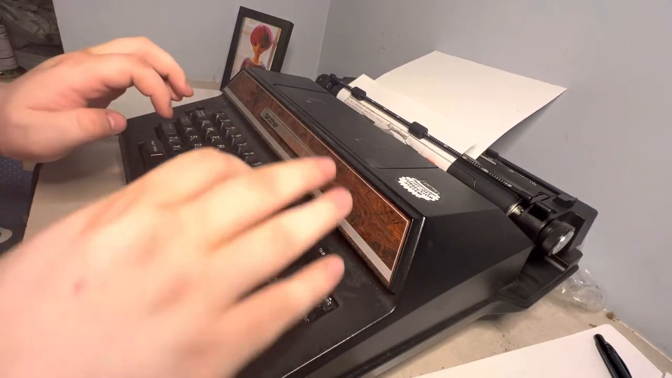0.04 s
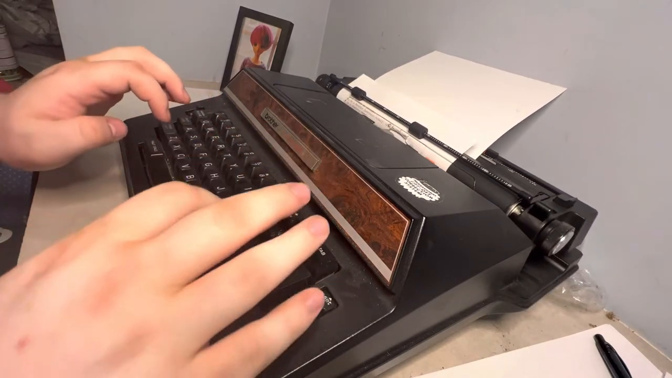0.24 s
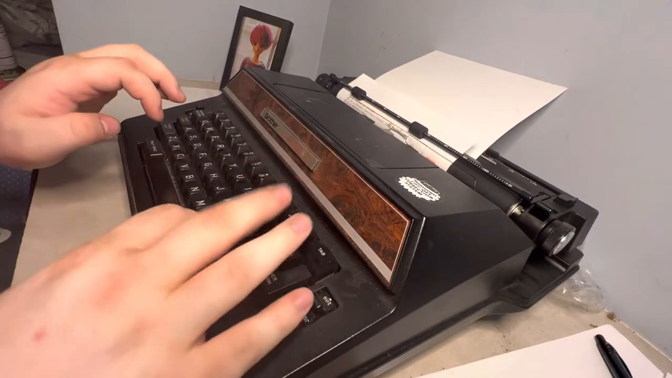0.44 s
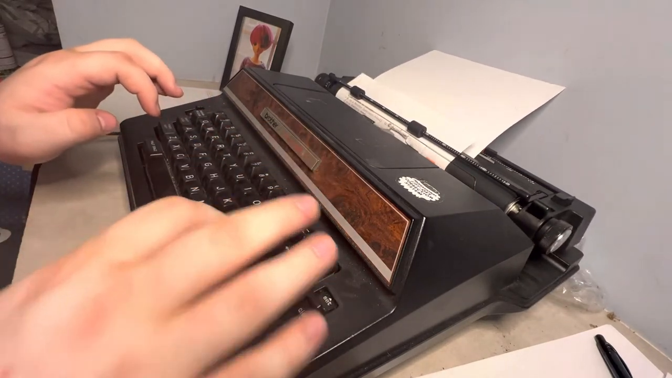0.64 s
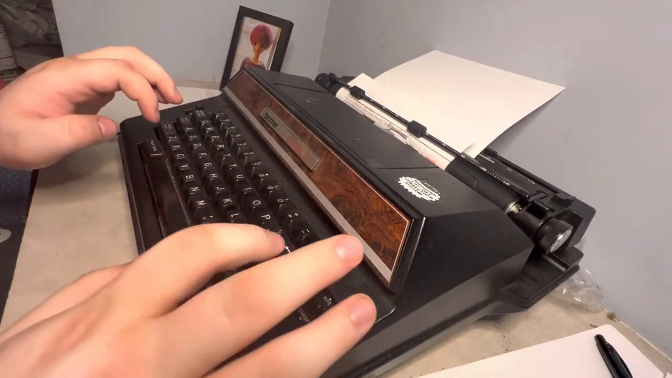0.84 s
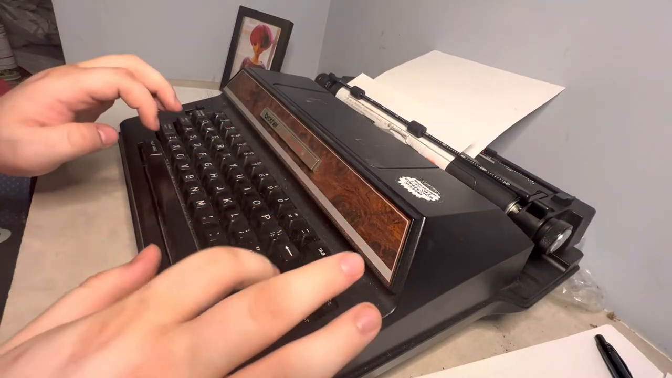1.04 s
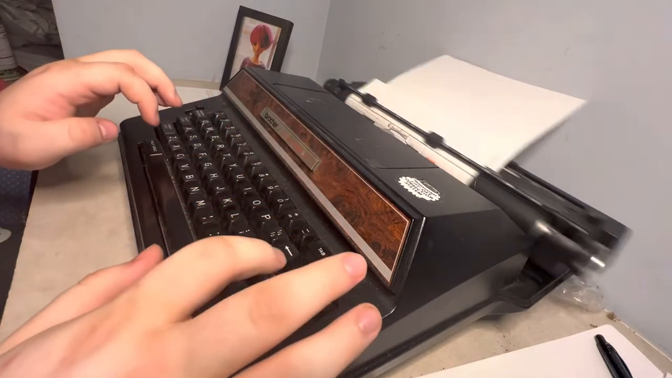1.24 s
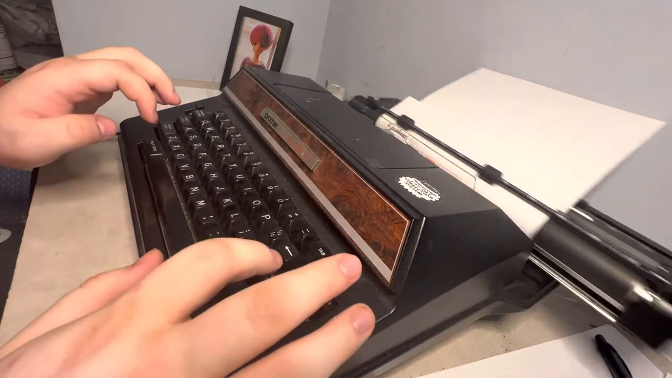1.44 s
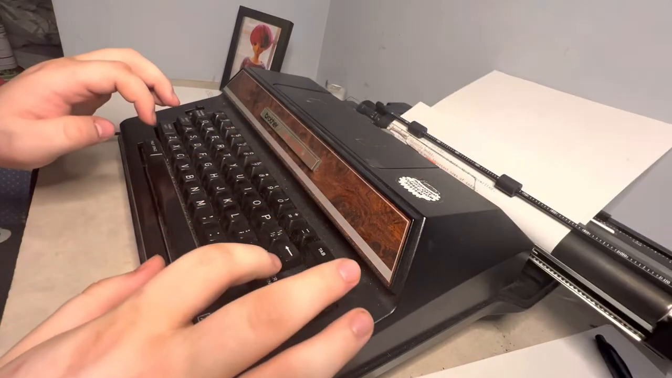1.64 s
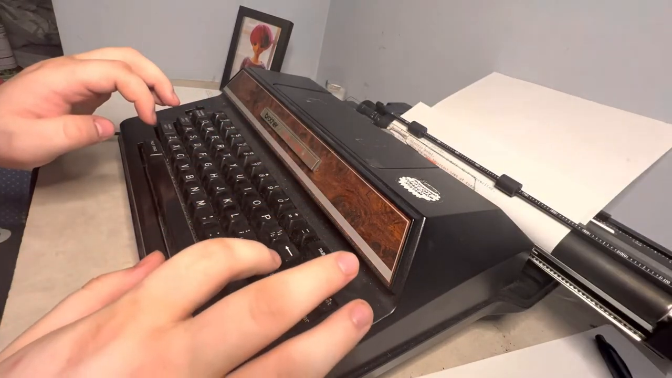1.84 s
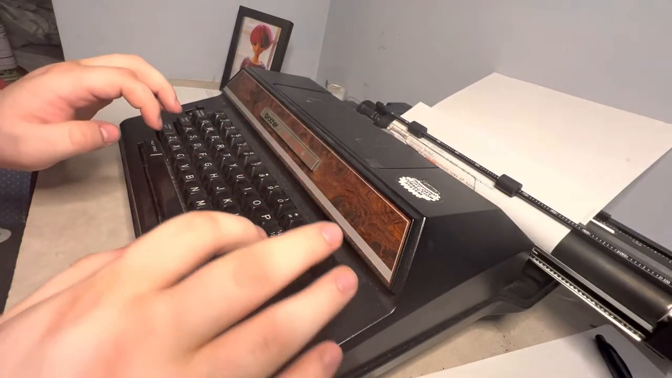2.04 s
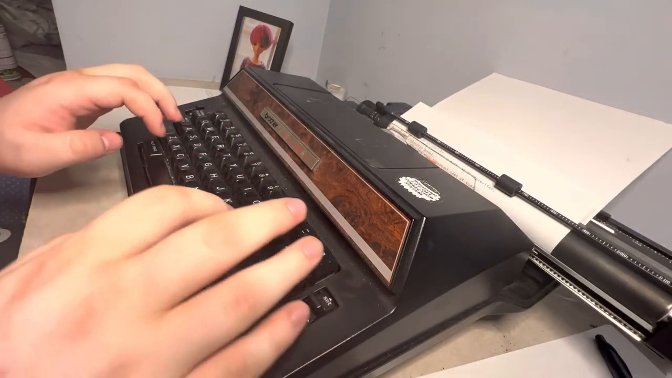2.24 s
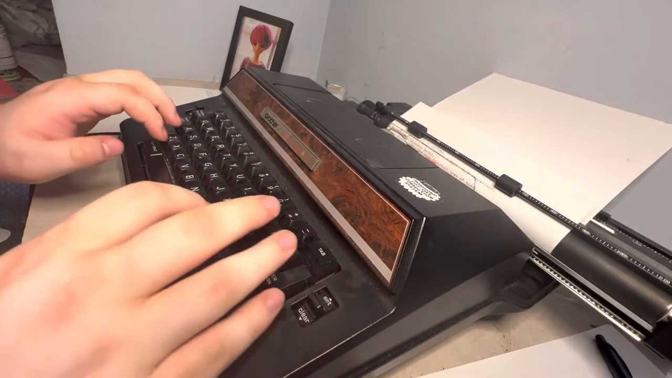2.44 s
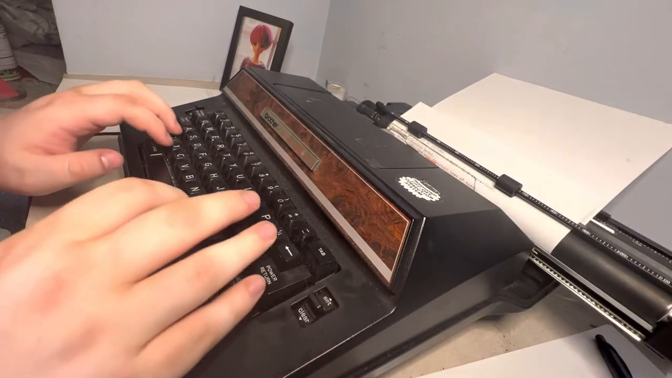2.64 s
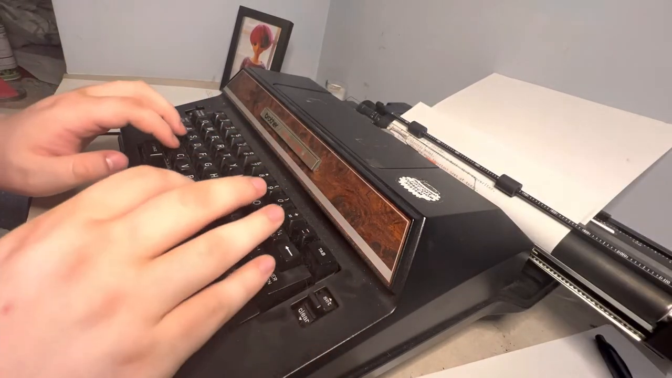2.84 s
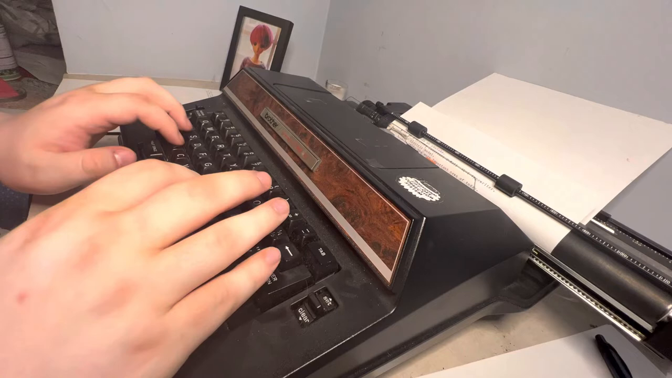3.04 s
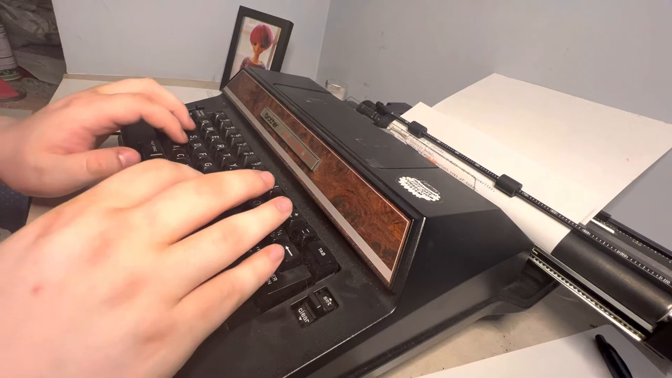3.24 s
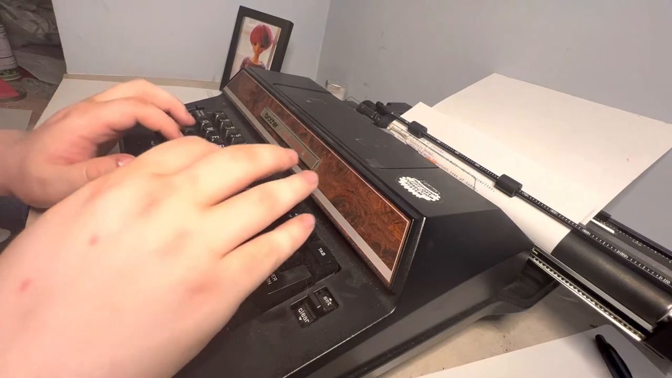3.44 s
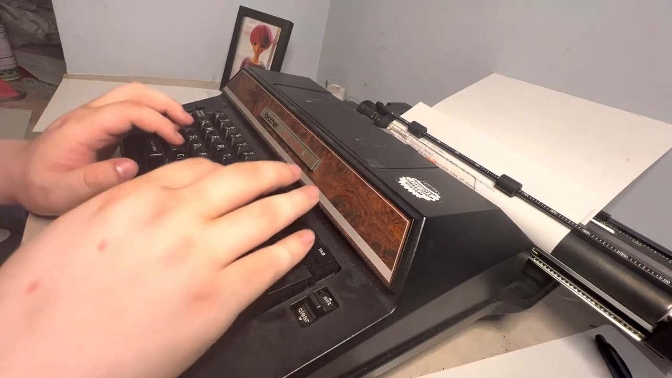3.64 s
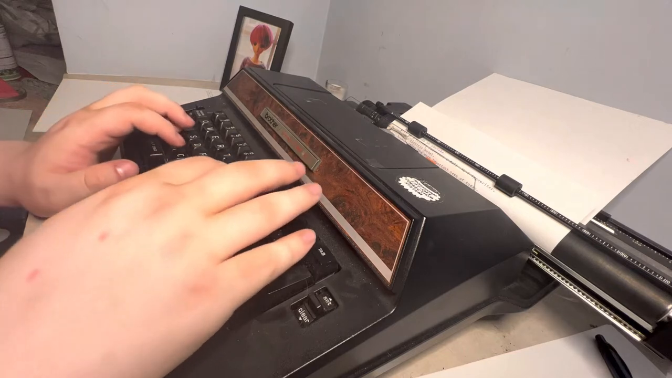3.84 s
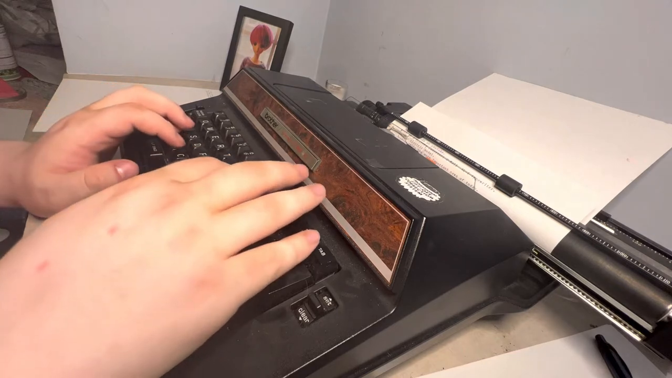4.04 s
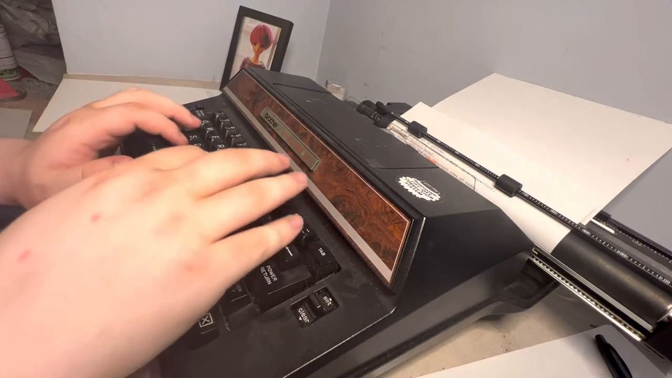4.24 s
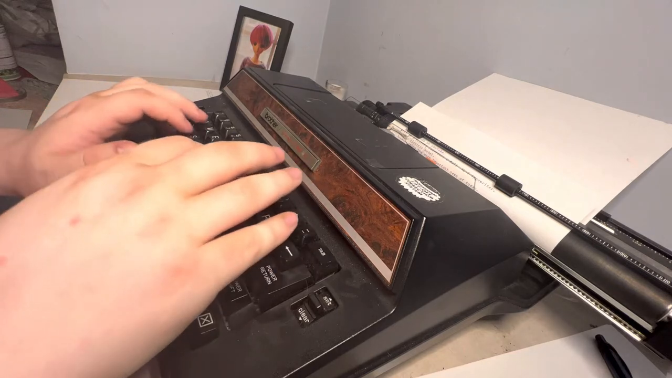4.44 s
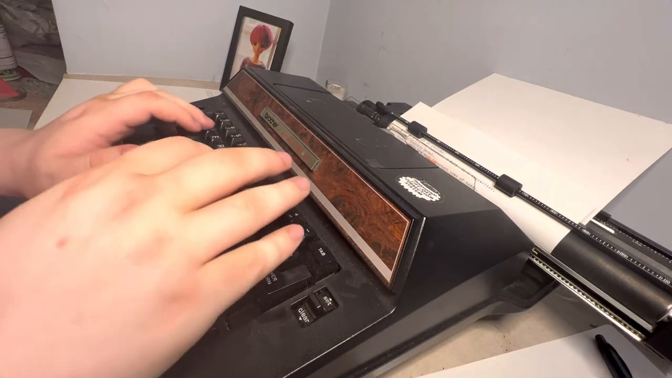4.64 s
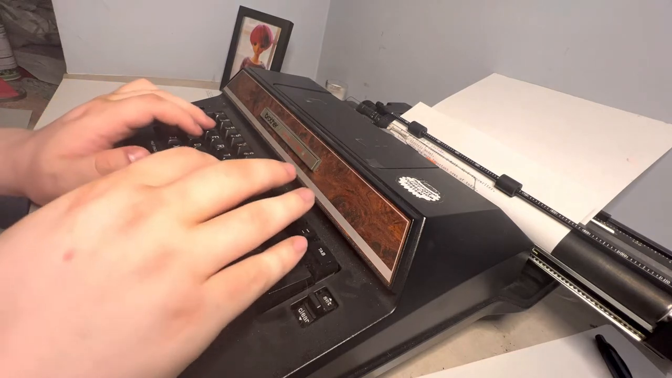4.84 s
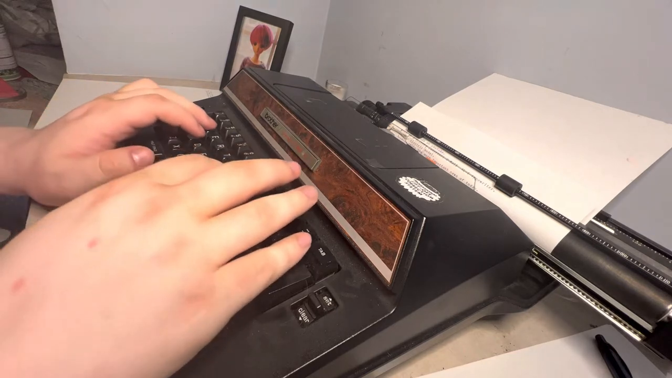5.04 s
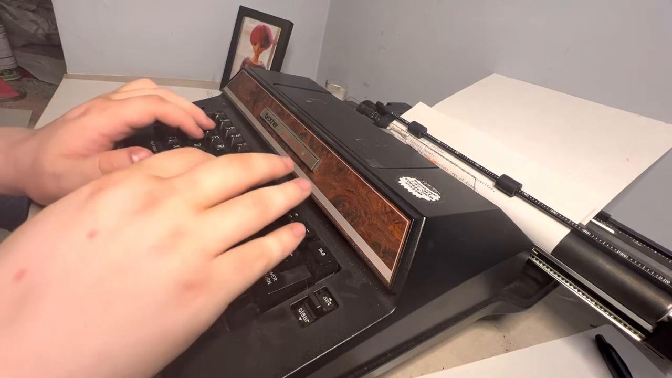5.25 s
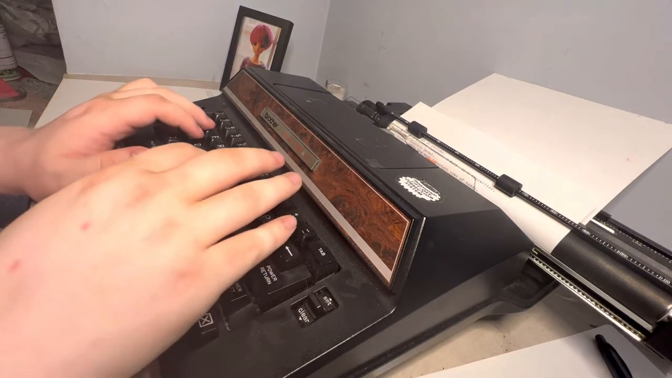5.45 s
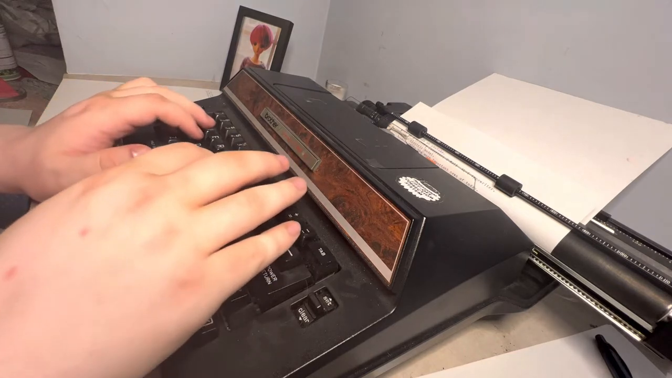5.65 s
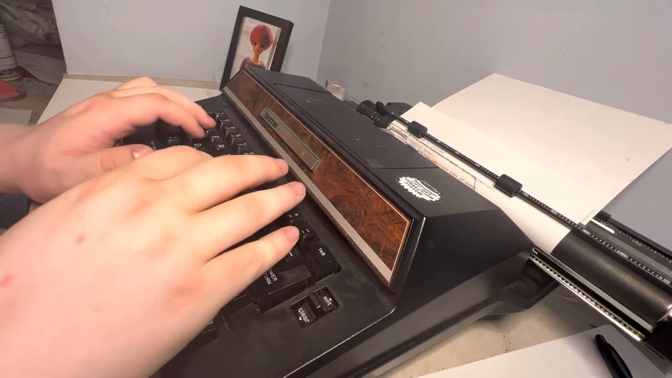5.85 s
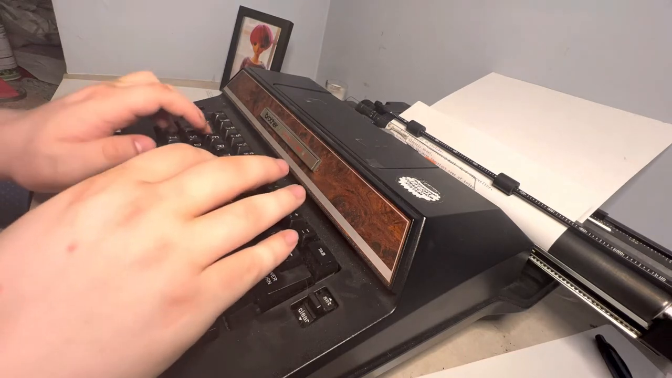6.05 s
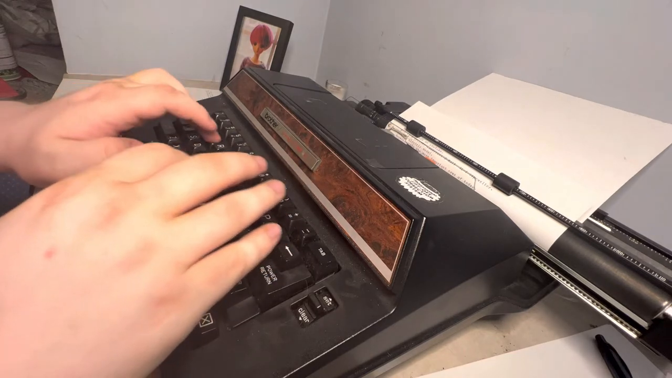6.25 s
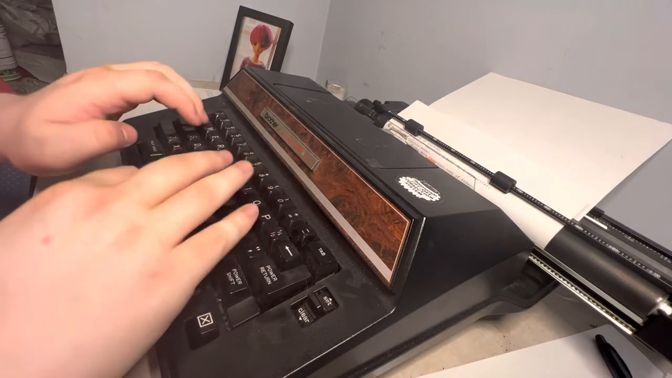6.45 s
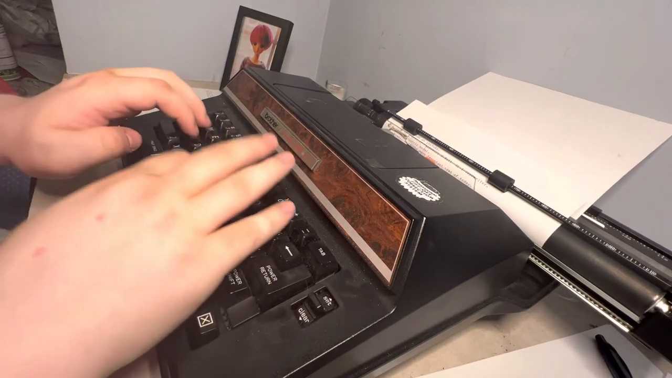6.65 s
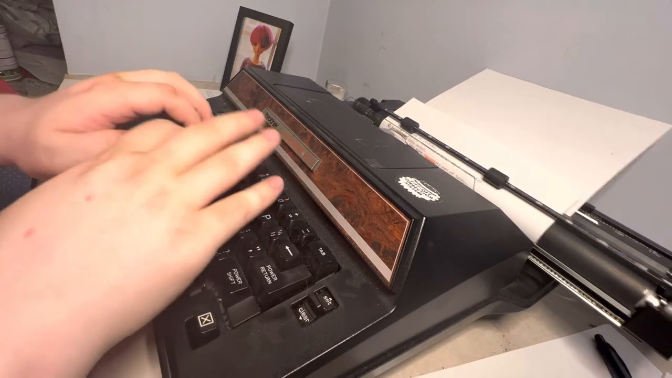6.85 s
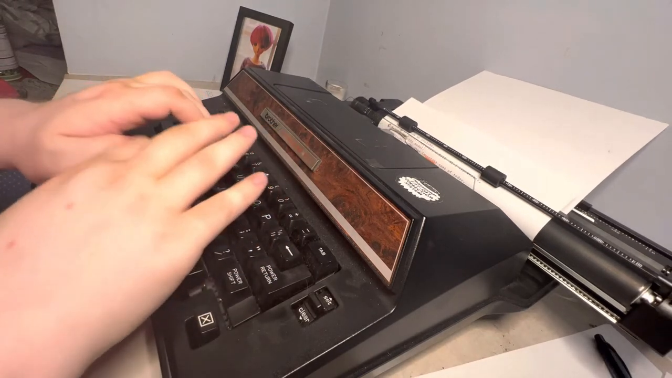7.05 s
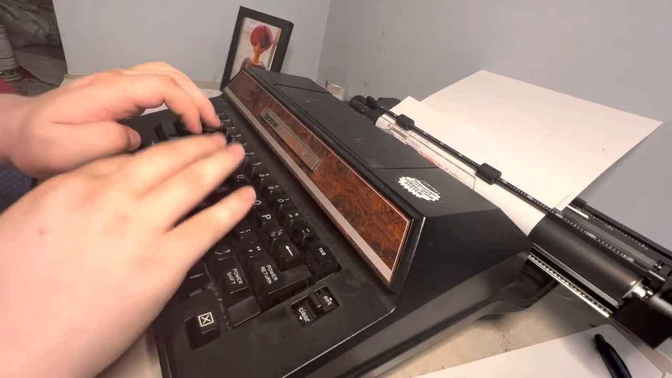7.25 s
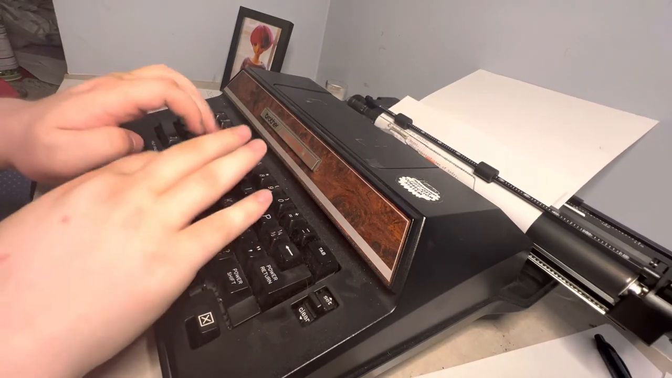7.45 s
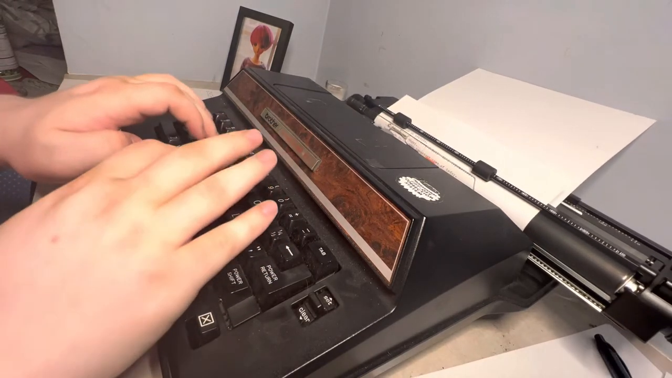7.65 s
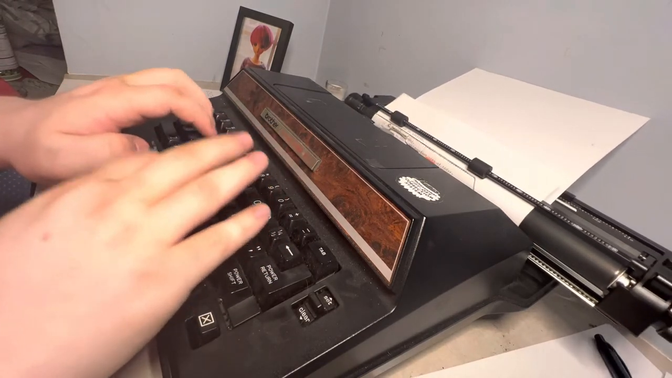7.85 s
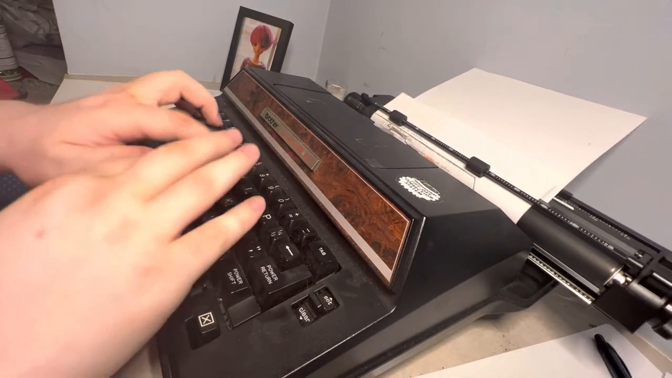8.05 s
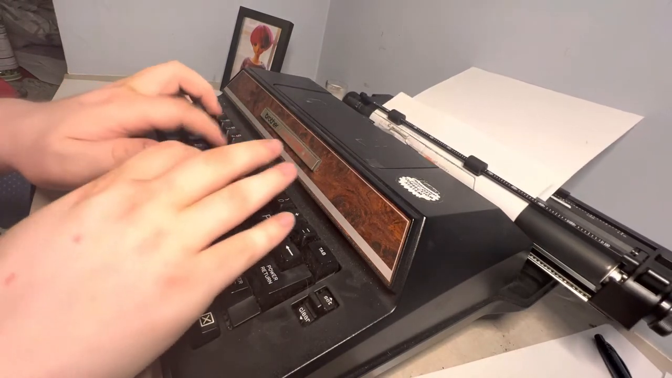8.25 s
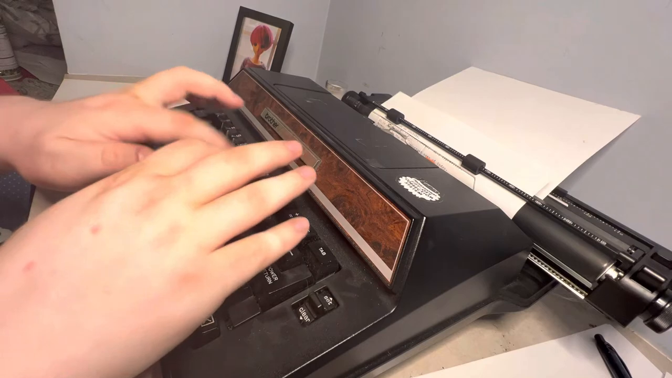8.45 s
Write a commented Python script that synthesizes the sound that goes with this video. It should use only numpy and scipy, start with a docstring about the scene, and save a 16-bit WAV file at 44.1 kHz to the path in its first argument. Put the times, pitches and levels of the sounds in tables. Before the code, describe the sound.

Throughout, a close electric typewriter hums low, pulsing about five times a second, with a soft, uneven belt whirr, in a small room with very short reverberation and a wide stereo image. Around 0.45-0.55 s one key snaps, levers clatter back and the case thumps, with almost no printing clack. At 0.95 s the return key ticks and knocks; at about 1.2 s the clutch grabs with hollow scrapes and the carriage drones roughly along its rail, slamming at 1.55 s into its stop with a bright ring of steel and springs. The motor runs alone until the shift snaps at 3.0 s and lands ringingly. Mostly hum follows, with a tiny tick at 4.65 s. A letter clacks at 5.95 s, the shift lands again at 6.1 s, another letter at 6.27 s, then quick uneven runs continue to the end, with dull space-bar knocks near 6.4, 7.2 and 7.95 s.

```python
"""An electric typewriter on a desk, close by in a small room: its motor hums, beats against the mains and whirrs.
First a key that prints nothing: a cam trips with a snap, levers clatter back and the case thumps, with hardly any clack.
The carriage then runs back along its rail, droning, and slams into its stop, which leaves steel and springs ringing.
Later the shift lands with a ring, and fast runs of letters clack on the platen between dull space-bar knocks.
Contacts are decaying noise, loose levers are showers of tiny contacts, and steel is a set of damped sines."""
import sys
import numpy as np
from scipy import signal
from scipy.fft import rfft, irfft, next_fast_len
from scipy.io import wavfile
from scipy.ndimage import map_coordinates

SR = 44100
rng = np.random.default_rng(int(sys.argv[2]) if len(sys.argv) > 2 else 0)


def wrap_up_sound(samples):
    """Save the sound to the file named by the first command line argument, as 16-bit audio."""
    columns = np.atleast_2d(samples).T
    # keep every value between -1 and 1, then stretch to whole-number steps
    tamed = np.clip(columns, -1, 1)
    steps = np.round(tamed * 32767).astype(np.int16)
    wavfile.write(sys.argv[1], SR, steps)


N = 375291
AGE = np.arange(SR // 2) / SR  # seconds since a contact
# All levels in dB are relative: the gains along a sound's path add up.


def amp(db):
    """Decibels to gain."""
    return 10 ** (np.asarray(db) / 20)


def unit(x):
    """Scale to rms 1."""
    return x / np.sqrt(np.mean(x ** 2) + 1e-20)


def along(points, hz):
    """Read (Hz, value) points on a log frequency axis."""
    f, v = np.transpose(points)
    return np.interp(np.log(hz + 1), np.log(f + 1), v)


def bumps(rows, hz):
    """Decibel curve of a set of resonances or notches."""
    return sum(db / (1 + (2 * (hz - centre) / width) ** 2) for centre, width, db in rows)


def wobble(rate):
    """A smooth random curve, rate knots a second."""
    knots = rng.standard_normal(int(N * rate / SR) + 4)
    return map_coordinates(knots, [np.arange(N) * rate / SR])


def shaped(x, gain_db, size=8192):
    """Minimum-phase filter that follows a dB curve of frequency, so nothing sounds before its cause."""
    hz = np.fft.rfftfreq(size, 1 / SR)
    cepstrum = irfft(np.log(amp(gain_db(hz)) + 1e-6))
    # fold the cepstrum forward in time
    cepstrum[1:size // 2] *= 2
    cepstrum[size // 2 + 1:] = 0
    response = irfft(np.exp(rfft(cepstrum)))
    return signal.oaconvolve(x, response[None], axes=1)[:, :N]


def coloured(x, points):
    """Give white sound a spectrum and keep its power."""
    power = np.mean(amp(along(points, np.linspace(0, SR / 2, SR // 8))) ** 2)
    return shaped(x, lambda hz: along(points, hz)) / np.sqrt(power)


def add(track, s, sound):
    """Mix a sound into a track at time s."""
    part = track[:, max(0, round(s * SR)):][:, :sound.shape[-1]]
    part += sound[..., :part.shape[1]]


def fade(t60):
    """Exponential decay by 60 dB in t60 seconds."""
    return np.exp(-np.log(1000) * AGE / t60)


def rise(seconds):
    """A soft start."""
    return 1 - np.exp(-(AGE / seconds) ** 2)


def crack(t60):
    """One hard contact: a decaying burst of noise."""
    return rng.standard_normal((2, len(AGE))) * fade(t60)


def rattle(t60, rate, scatter_db, grain_t60=0.011):
    """Loose levers chatter: many tiny contacts of uneven size that die away."""
    struck = rng.random(len(AGE)) < rate / SR
    hits = struck * amp(scatter_db * np.clip(rng.standard_normal(len(AGE)), -2, 2))
    energy = np.abs(signal.fftconvolve(hits ** 2, fade(grain_t60) ** 2)[:len(AGE)])
    return unit(np.sqrt(energy)) * crack(t60)


def ring(modes, detune):
    """Damped modes, struck a little differently every time."""
    chance = rng.standard_normal((len(modes), 3))
    sound = 0
    for (hz, db, t60), (force, shift, phase) in zip(modes, chance):
        tone = np.sin(2 * np.pi * (hz * (1 + detune * shift) * AGE + phase))
        sound = sound + amp(db + 2 * force) * fade(t60) * tone
    return sound


def bars(t60, low_hz, high_hz, count=14):
    """Every strike sets a different random group of steel bars and springs ringing."""
    place, phase, size = rng.random((3, count, 1))
    hz = low_hz * (high_hz / low_hz) ** place
    path = rng.random((2, count, 1))  # each port hears a bar at its own phase
    t = AGE[AGE < t60]
    sound = unit(np.sum(size * np.sin(2 * np.pi * (hz * t + phase + path)), axis=1))
    return np.pad(sound, ((0, 0), (0, len(AGE) - len(t)))) * fade(t60)


def chatter(t60):
    """Levers falling back: mostly loose rattle, with some ringing bars."""
    loose = rattle(t60, rate=700, scatter_db=3)
    return 1.1 * loose + .65 * bars(.75 * t60, low_hz=1100, high_hz=10000, count=36)


SHAFT_HZ, MAINS_HZ = 57.62, 60
# lines of the turning shaft: multiple of SHAFT_HZ, left_db, right_db
SHAFT_LINES = [(1, -51, -49), (2, -51, -47), (3, -70, -63), (6, -49, -59)]
# lines of the mains: multiple of MAINS_HZ, left_db, right_db
MAINS_LINES = [(1, -64, -62), (2, -50, -46), (4, -64, -64)]
# lines of the belt: pitch_hz, left_db, right_db
BELT_LINES = [(65.5, -53.5, -53), (83, -64, -62), (122, -69, -67.5), (124, -64.5, -57), (174, -68, -65),
              (329.5, -64, -79)]


def hum(right_lag_s=0.0011, opposed_s=3.69):
    """The rotor slips behind the mains, so their lines near 120 Hz throb about five times a second."""
    # shaft and mains pull against each other at opposed_s
    t = np.arange(N) / SR - opposed_s - np.array([[0], [right_lag_s]])
    turns = SHAFT_HZ * t + .01 * wobble(5)

    def line(cycles, left_db, right_db):
        """One steady sine with its rms level in each channel."""
        return np.sqrt(2) * amp([[left_db], [right_db]]) * np.sin(2 * np.pi * cycles)

    shaft = sum(line(k * turns, left, right) for k, left, right in SHAFT_LINES)
    mains = sum(line(k * MAINS_HZ * t, left, right) for k, left, right in MAINS_LINES)
    belt = sum(line(hz * t + 0.047 * wobble(9.1), left, right) for hz, left, right in BELT_LINES)
    return shaft - mains + belt


# rubbing of belt and power roller: pitch_hz, level_db (per Hz)
WHIRR_COLOUR = [(25, -31), (42, -9.5), (56, -28.5), (110, -10), (155, -18), (230, -17.5), (290, -26),
                (345, -22), (600, -25), (950, -24), (1700, -30), (1850, -34.5), (2400, -38), (4250, -48),
                (7100, -44.5), (10000, -50), (16000, -67.5)]
# resonances of the motor and its drive: pitch_hz, width_hz, lift_db
DRIVE_BODY = [(342, 36, 7), (475, 40, 5), (650, 50, 2), (755, 30, 4), (850, 40, 3), (918, 40, 6),
              (1000, 50, 3), (1160, 30, 4), (1440, 28, 7), (1530, 60, 3), (1640, 40, 4), (2080, 30, 6)]


def whirr():
    """The belt and the power roller rub, a little unevenly with every turn, and the drive resonates."""
    turn = np.sin(2 * np.pi * SHAFT_HZ * np.arange(N) / SR)
    uneven_db = 1.1 * wobble(24) + .7 * wobble(9) + 1.6 * turn
    noise = rng.standard_normal((2, N)) * amp(uneven_db)
    return amp(-55.0) * shaped(coloured(noise, WHIRR_COLOUR), lambda hz: bumps(DRIVE_BODY, hz))


# keystrokes; the first is a key that prints nothing, with hardly any clack, the rest are letters:
# trip_s, fling_s, strike_s, force_db, trip_db, fling_db, strike_db, thump_db, cam_ping_hz, bar_ping_hz
KEYSTROKES = [(0.4565, 0.4827, 0.5135, -5, -5.5, -3, -22, 2.5, 6400, 8400),
              (5.895, 5.9178, 5.9503, -4, -8, -0.5, -6, -1, 9200, 6700),
              (6.214, 6.24, 6.2721, -2.5, -7.5, -4, -10, 0, 8870, 6370),
              (6.67, 6.698, 6.728, -2, -7.5, -5, -10, -2.5, 8370, 6280),
              (6.784, 6.804, 6.838, -2.5, -10.5, -3, -7.5, -1, 9000, 8870),
              (6.9288, 6.957, 6.9887, -1, -7, -7.5, -10.5, -1.5, 8100, 6440),
              (7.061, 7.083, 7.1139, -1.5, -11, -7.5, -5.5, -3, 9200, 6270),
              (7.371, 7.397, 7.4277, -2.5, -4.5, -7.5, -7.5, 0, 8080, 5750),
              (7.485, 7.509, 7.5407, -3.5, -9, -3.5, -6.5, 0, 9100, 6400),
              (7.645, 7.6695, 7.7023, -3.5, -8.5, -3.5, -6, -2, 9700, 5900),
              (7.7587, 7.787, 7.8172, -3.5, -4, -4, -7, 0, 8200, 6370),
              (8.082, 8.104, 8.136, -2, -10.5, -5, -12, -2.5, 8860, 6280),
              (8.2855, 8.3118, 8.3426, -3.5, -9.5, -2, -10.5, -1, 9100, 6350),
              (8.49, 8.516, 8.547, -4.5, -8.5, -10.5, -9, 0, 9610, 6200)]
# single snaps of return key, carriage latch, shift linkage, a brushed key and levers in the fast runs:
# start_s, level_db, ping_hz, rattle_db
LATCHES = [(0.9445, -20, 5090, -13), (1.0725, -26.5, 4800, -13), (1.547, -8, 5920, -18.5),
           (3.024, -14.5, 4570, -8.5), (3.037, -13.5, 4600, -12.5), (4.6518, -37, 9190, -19),
           (7.5326, -10, 9630, -13), (7.808, -12.5, 9600, -17), (8.165, -12, 5600, -9.5)]
# the shift goes down, and up again after the capital:
# start_s, latch_db, travel_s, landing_db, treble_db, thump_db
SHIFTS = [(3.0145, -7, .057, -11, 2.5, -15), (6.078, -6, .047, -7, 1.5, -18.5)]
SHIFT_PING_HZ, SHIFT_RATTLE_DB = 8780, -6.5
TRIP_RATTLE_DB, FLING_RATTLE_DB = -1, -1
GUIDE_LEAD_S, GUIDE_DB, GUIDE_PING_HZ, GUIDE_RATTLE_DB = 0.007, -8.5, 5040, 1


def snap_times():
    """Every snap as (start_s, level_db, ping_hz, rattle_db); a keystroke snaps three times before it strikes."""
    rows = list(LATCHES)
    rows += [(s, db, SHIFT_PING_HZ, SHIFT_RATTLE_DB) for s, db, *_ in SHIFTS]
    for trip_s, fling_s, strike_s, force_db, trip_db, fling_db, _, _, cam_hz, bar_hz in KEYSTROKES:
        rows += [(trip_s, force_db + trip_db, cam_hz, TRIP_RATTLE_DB),
                 (fling_s, force_db + fling_db, bar_hz, FLING_RATTLE_DB),
                 (strike_s - GUIDE_LEAD_S, force_db + GUIDE_DB, GUIDE_PING_HZ, GUIDE_RATTLE_DB)]
    return rows


# snap of a cam or latch: pitch_hz, level_db (per Hz)
SNAP_COLOUR = [(100, 3), (400, -8.5), (1500, -2), (4000, -3), (6500, 1.5), (9700, 0.5), (11200, -6.5),
               (12200, -7), (16000, -11.5)]


def linkage():
    """The cam scrapes on the roller, then snaps the lever: a short ping and a shiver of the neighbouring bars."""
    snaps, pings = np.zeros((2, 2, N))
    grip_s, scrape_db, attack_s = .014, -19, .0011
    grip = np.clip(AGE / grip_s, 0, 1) ** 1.5 * (AGE < grip_s + attack_s)
    for s, db, ping_hz, rattle_db in snap_times():
        # the harder the cam grips, the more it scrapes and the more the bars shiver
        scrape = grip * rng.standard_normal((2, len(AGE)))
        add(snaps, s - grip_s, amp(db + rattle_db + scrape_db) * scrape)
        snap = rattle(t60=0.099, rate=2400, scatter_db=2.0)
        snap = snap + amp(-12) * bars(t60=0.025, low_hz=4080, high_hz=10640, count=24)
        shiver = amp(rattle_db) * rattle(t60=.14, rate=1100, scatter_db=3)
        add(snaps, s, amp(db - 13.0) * rise(attack_s) * (snap + shiver + 2 * crack(t60=0.014)))
        ping = ring([(ping_hz, 0, .02)], detune=.01)
        add(pings, s + attack_s, amp(db - 8) * rise(attack_s) * ping)
    return coloured(snaps, SNAP_COLOUR) + pings


CLINK_DB, CLINK_GAP_S, CLINK_LOSS_DB, CLINK_T60_S = -16, .007, 1.5, .026


def clinks(count=7):
    """Parts bounce back into place: separate steel contacts, each with its own notes, ever weaker."""
    track = np.zeros((2, len(AGE)))
    for k, scatter in enumerate(rng.random(count)):
        s = (k + scatter) * CLINK_GAP_S
        add(track, s, amp(-CLINK_LOSS_DB * k) * bars(CLINK_T60_S, low_hz=1309, high_hz=6993, count=4))
    return track


# short clack of a slug on the platen: pitch_hz, level_db, t60_s
PLATEN = [(1600, 0.5, 0.012), (1820, -9, 0.0021), (2720, 7.5, 0.0043), (5110, -4, 0.0099)]
# noise of the slug hitting: pitch_hz, level_db (per Hz)
SLUG_COLOUR = [(100, 1.5), (500, -15), (1100, -11.5), (1500, -4.5), (2200, -10), (3000, -6), (5000, -32),
               (9000, -45), (16000, -61.5)]
# levers falling back: pitch_hz, level_db (per Hz)
CLATTER_COLOUR = [(60, 2.5), (250, -1.5), (700, -3.5), (1500, -14), (3000, -16.5), (5000, -8.5), (7000, -9),
                  (9500, -9), (12000, -21), (16000, -22)]
# dull contacts, for the drag of the cam and for heavier parts: pitch_hz, level_db (per Hz)
KNOCK_COLOUR = [(80, -12.5), (300, 4), (900, 5), (1600, 0.5), (2500, 2.5), (4000, 5.5), (8000, -27),
                (16000, -26)]
# the case rocks on the desk: pitch_hz, level_db, t60_s
CASE = [(48.5, -6, 0.27), (62.86, -3.5, 0.45), (79.2, -6, 0.12), (102, 0, 0.27), (155, -0.5, 0.18),
        (167, -1.5, 0.18), (213.8, -5.5, 0.31), (340.1, -15.5, 0.27)]
DRAG_LAG_S, DRAG_DB = .01, -26.5
CLACK_DB, SMACK_DB, BAR_RING_DB = -3, -6.5, -20
CLATTER_DB, THUMP_DB = -20, -27
STEP_LAG_S, STEP_CLATTER_DB, STEP_THUMP_DB = .031, -23.5, -27  # a second, later landing


def keystrokes():
    """Cam drag, strike, clatter back and rocking case; letters clack on the platen, the first key hardly at all."""
    drags, smacks, clacks, clatter, thumps = np.zeros((5, 2, N))
    for trip_s, _, strike_s, force_db, _, _, strike_db, thump_db, *_ in KEYSTROKES:
        add(drags, trip_s + DRAG_LAG_S, amp(force_db + DRAG_DB) * rise(0.0062) * chatter(t60=0.25))
        # strong for letters, very weak for the first key
        hit_db = force_db + strike_db
        add(clacks, strike_s, amp(hit_db + CLACK_DB) * rise(.0004) * ring(PLATEN, detune=.05))
        smack = crack(t60=0.012) + amp(-15.5) * crack(t60=0.033)
        add(smacks, strike_s, amp(hit_db + SMACK_DB) * smack)
        # every stroke rings a few notes of its own
        own_ring = bars(t60=0.066, low_hz=984, high_hz=6560, count=12)
        add(clatter, strike_s, amp(force_db + BAR_RING_DB) * own_ring)
        # the parts bounce and fall back
        add(clacks, strike_s + CLINK_GAP_S, amp(force_db + CLINK_DB) * clinks())
        add(clatter, strike_s - .0025, amp(force_db + CLATTER_DB) * rise(0.0028) * chatter(t60=0.22))
        step_s = strike_s + STEP_LAG_S
        add(clatter, step_s, amp(force_db + STEP_CLATTER_DB) * rise(0.0016) * chatter(t60=0.088))
        # the case rocks at the strike and again at the later landing
        rock_db = force_db + thump_db
        add(thumps, strike_s, amp(rock_db + THUMP_DB) * rise(0.0063) * ring(CASE, detune=.055))
        add(thumps, step_s, amp(rock_db + STEP_THUMP_DB) * rise(0.0052) * ring(CASE, detune=.055))
    noises = coloured(drags, KNOCK_COLOUR) + coloured(smacks, SLUG_COLOUR) + coloured(clatter, CLATTER_COLOUR)
    return noises + clacks + thumps


# return key, clutch and margin stop each land twice:
# start_s, level_db, second_after_s, second_db, treble_db, thump_db, rattle_t60_s
RETURN_KNOCKS = [(0.942, -28, 0.017, -27, -3, -9, 0.11), (1.172, -34, .019, -22, -2, -9, 0.14),
                 (1.514, -13, .018, -9, 2.5, -12.5, 0.12), (1.6116, -26, 0.0054, -28.5, 1.5, -17, .07)]
# space bar: start_s, level_db, held_s
SPACES = [(6.421, -24, .141), (7.194, -24.5, 0.093), (7.947, -24, 0.11)]
# knocks while the bar goes down and the carriage steps: delay_s, level_db
SPACE_STEPS = [(0, -3.5), (.034, -2.5), (.066, -2.5)]
SPACE_RELEASE_DB, SPACE_TREBLE_DB, SPACE_THUMP_DB, SPACE_T60_S = -8, 2.5, -2, 0.18
SHIFT_T60_S = 0.039
SHIFT_JOLT_DB, SHIFT_JOLT_THUMP_DB, SHIFT_JOLT_T60_S = -21, -7.5, 0.4  # the latch jolts the type basket


def knock_times():
    """Every landing of carriage, shift and space bar as (start_s, level_db, treble_db, thump_db, rattle_t60_s)."""
    rows = []
    for s, db, delay_s, second_db, *timbre in RETURN_KNOCKS:
        rows += [(s, db, *timbre), (s + delay_s, second_db, *timbre)]
    for s, latch_db, travel_s, *landing in SHIFTS:
        rows.append((s, latch_db + SHIFT_JOLT_DB, 0, SHIFT_JOLT_THUMP_DB, SHIFT_JOLT_T60_S))
        rows.append((s + travel_s, *landing, SHIFT_T60_S))
    for s, db, held_s in SPACES:
        for delay_s, step_db in [*SPACE_STEPS, (held_s, SPACE_RELEASE_DB)]:
            rows.append((s + delay_s, db + step_db, SPACE_TREBLE_DB, SPACE_THUMP_DB, SPACE_T60_S))
    return rows


# jingle of springs: pitch_hz, level_db (per Hz)
JINGLE_COLOUR = [(1000, -16), (2500, -16), (4500, 8), (6500, 8.5), (9500, 4), (12000, -6.5), (16000, -10)]


def knocks():
    """Heavier parts land: a dull knock, jingling springs and a thump."""
    dull, bright, thumps = np.zeros((3, 2, N))
    for s, db, treble_db, thump_db, t60 in knock_times():
        contact_s = 0.0022 * amp(-min(treble_db, 0))  # a softer contact lasts longer
        impact = .9 * rattle(t60=.055, rate=2000, scatter_db=2)
        blow = rise(contact_s) * (0.82 * chatter(t60) + impact)
        add(dull, s, amp(db - 9.0) * blow)
        add(bright, s, amp(db + treble_db - 9.0) * blow)
        add(thumps, s, amp(db + thump_db - 10.0) * rise(0.0049) * ring(CASE, detune=0.04))
    return coloured(dull, KNOCK_COLOUR) + coloured(bright, JINGLE_COLOUR) + thumps


# ticks of the return key's catches: start_s, level_db
CATCH_TICKS = [(0.9457, -33.5), (1.073, -30)]
# ring of a catch: pitch_hz, level_db, t60_s
CATCH = [(4750, 1, .013), (4990, -8, .025), (6450, -3, .012), (6830, -6, .025), (9265, -4, .02),
         (9900, -3, .022), (11700, -1, .014)]


def latch_ticks():
    """The two small steel catches of the return key tick clearly."""
    ticks = np.zeros((2, N))
    for s, db in CATCH_TICKS:
        add(ticks, s, amp(db) * (ring(CATCH, detune=.004) + 1.3 * crack(t60=.012)))
    return ticks


# the return lever lands, the clutch grabs in jerks: start_s, level_db
CLUTCH_BLOWS = [(0.958, -35), (1.188, -37.5), (1.204, -36), (1.219, -39)]
# their hollow ring: pitch_hz, level_db, t60_s
CLUTCH = [(850, 5, .075), (1090, -4.5, 0.052), (1480, -9, 0.079), (1610, -2, .11), (1717, -3, 0.12),
          (1940, -6, .08), (2180, 2, .09), (2306, -1, 0.1), (2673, -2, .07)]
# their scrape: pitch_hz, level_db (per Hz)
SCRAPE_COLOUR = [(100, -27.5), (600, -5), (1000, 0.5), (1700, 3), (2500, -3), (4000, -25), (9000, -14),
                 (16000, -32)]


def clutch(scrape_db=2):
    """The return lever and the clutch it throws in ring hollow and scrape as they take hold."""
    rings, scrapes = np.zeros((2, 2, N))
    for s, db in CLUTCH_BLOWS:
        hollow = np.array([ring(CLUTCH, detune=.008), ring(CLUTCH, detune=.008)])
        add(rings, s, amp(db - 2.5) * rise(.001) * hollow)
        add(scrapes, s, amp(db + scrape_db) * rattle(t60=0.072, rate=170, scatter_db=5))
    return rings + coloured(scrapes, SCRAPE_COLOUR)


# course of the rail noise: time_s, level_db
RAIL_COURSE = [(1.235, -43.5), (1.29, -44), (1.335, -45), (1.41, -46.5), (1.438, -53), (1.462, -49),
               (1.505, -48)]
# rail noise: pitch_hz, level_db (per Hz)
RAIL_COLOUR = [(60, -29.5), (170, -3), (320, -16), (600, -13), (1500, -14), (3000, -16), (6000, -15),
               (10000, -21.5), (15000, -32)]
# resonances of the rail: pitch_hz, width_hz, lift_db
RAIL_BODY = [(880, 90, 4), (1500, 160, 5), (1720, 100, 3)]
RETURN_START_S, RETURN_END_S = 1.2, 1.51  # the carriage runs back
RAIL_DB, DRONE_DB = -2, -34
SURGE_AT_S, SURGE_EVERY_S = 1.252, .12


def carriage(drone_hz=117, grain_hz=150):
    """The carriage drags along its rail with a fine rough grain; the loaded drive drones in surges."""
    t = np.arange(N) / SR
    corners_s = [RETURN_START_S - .02, RETURN_START_S, RETURN_END_S, RETURN_END_S + 0.096]
    running = np.interp(t, corners_s, [0, 1, 1, 0])
    rail_db = RAIL_DB + np.interp(t, *np.transpose(RAIL_COURSE))
    grain = np.exp(-4 * ((grain_hz * t + .5 * wobble(40)) % 1))
    roughness = unit((.35 + grain) * amp(2 * wobble(300)))
    scraping = coloured(rng.standard_normal((2, N)) * roughness, RAIL_COLOUR)
    rail = shaped(scraping, lambda hz: bumps(RAIL_BODY, hz))
    surge = np.abs(np.cos(np.pi * (t - SURGE_AT_S) / SURGE_EVERY_S)) ** 1.5
    phase = 2 * np.pi * drone_hz * (t - SURGE_AT_S) + .4 * wobble(20)
    drone = surge * (np.sin(phase) + amp(-23.5) * np.sin(2 * phase))
    return running * (amp(rail_db) * rail + amp(DRONE_DB) * drone)


# the carriage rings after hitting its stop: pitch_hz, level_db, t60_s
STEEL = [(460.4, -4.5, 0.15), (1160, -8.5, 0.085), (1642, -5, 0.14), (2170, -25.5, 0.31), (4985, -12, 0.14),
         (5900, -5, 0.074), (7160, -45, 1.5), (9750, -18, .12)]
SPRINGS_HZ, SPRINGS_DB, SPRINGS_T60_S = (5700, 6480), -33, .26  # the springs spread over this band


def margin_stop(s=1.546, ring_db=-22, lurch_db=-21):
    """The carriage slams home: steel and a cluster of springs ring on and the machine lurches on the desk."""
    slam = np.zeros((2, N))
    steel = np.array([ring(STEEL, detune=0.00068), ring(STEEL, detune=0.0016)])
    add(slam, s, amp(ring_db) * rise(0.001) * steel)
    add(slam, s, amp(SPRINGS_DB) * rise(.002) * bars(SPRINGS_T60_S, *SPRINGS_HZ, count=60))
    lurch = ring([(40, -7.5, .3), (61.5, 1.0, 0.18), (111.0, 0.5, 0.16)], detune=.02)
    add(slam, s, amp(lurch_db) * rise(0.014) * lurch)
    return slam


# ring of the type basket: pitch_hz, level_db, t60_s
BASKET = [(793, -15, 0.19), (1868, -8.5, 0.12), (2277, -9.5, 0.12), (2936, 2.5, 0.11), (3445, 5, .13),
          (6465, -10, .09), (6920, 4, .08)]
BASKET_DB = -28


def basket():
    """The shifted type basket lands and its frame rings."""
    rings = np.zeros((2, N))
    for s, _, travel_s, db, *_ in SHIFTS:
        frame = np.array([ring(BASKET, detune=.004), ring(BASKET, detune=0.005)])
        add(rings, s + travel_s, amp(db + BASKET_DB) * rise(0.0017) * frame)
    return rings


# reverberation of the small room: pitch_hz, t60_s
ROOM = [(100, 0.16), (300, 0.2), (1500, 0.18), (5000, 0.13), (13000, 0.11)]


def room(x, size=4096):
    """Desk and walls answer: each frequency dies at its own speed, each short slice of sound by fresh paths."""
    hop, length = size // 2, SR // 4
    starts = range(-hop, N, hop)
    noise = rng.standard_normal((len(starts), 2, length), dtype=np.float32)
    hz, t, z = signal.stft(noise, SR, nperseg=256)
    decay = amp(-60 * t / along(ROOM, hz)[:, None]).astype(np.float32)
    tails = signal.istft(z * decay, SR, nperseg=256)[1][..., :length] * rise(0.00091)[:length]
    tails /= np.sqrt(np.mean(np.sum(tails ** 2, axis=-1)))
    # overlapping slices, each answered by its own tail
    padded, window = np.pad(x, ((0, 0), (hop, size))), signal.windows.cosine(size)
    pieces = np.array([padded[:, i + hop:][:, :size] * window for i in starts])
    answers = signal.fftconvolve(pieces.astype(np.float32), tails.astype(np.float32), axes=-1)
    wet = np.zeros_like(padded)
    for i, answer in zip(starts, answers):
        add(wet, (i + hop) / SR, answer)
    return wet[:, hop:hop + N]


# stereo width, 1 central, 0 wide, -1 opposed: pitch_hz, correlation
STEREO_WIDTH = [(60, .95), (160, .85), (300, -.3), (600, -.1), (2000, -.1), (3600, .15), (9600, -.05),
                (10200, -.3), (10550, -.92), (11550, -.92), (12500, .95), (14300, .95), (15600, -.7)]
# left over right: pitch_hz, lean_db
BALANCE = [(60, -1.5), (170, -6), (340, 3.5), (550, -1), (800, 0.5), (1500, -1), (2400, 1), (4000, 3.5),
           (5500, 10), (7000, 5.5), (8500, 8.5), (9600, -2.5), (11000, 0.5)]


def spread(x):
    """Stereo width: low bass central, mids wide, narrow or opposed bands in the top treble; each band leans."""
    size = next_fast_len(N + SR // 4)
    hz = np.fft.rfftfreq(size, 1 / SR)
    a, b = rfft(x, size)
    turn = np.arccos(np.clip(along(STEREO_WIDTH, hz), -1, 1)) / 2
    mid = np.cos(turn) * (a + b) / np.sqrt(2)
    side = np.sin(turn) * (a - b) / np.sqrt(2)
    lean_db = along(BALANCE, hz) / 2  # the left port faces the type basket
    return irfft(np.array([(mid + side) * amp(lean_db), (mid - side) * amp(-lean_db)]), size)[:, :N]


# resonances of the machine's frame: pitch_hz, width_hz, lift_db
FRAME = [(215, 25, 4), (345, 34, 6), (475, 40, 7.5), (653, 22, 6), (758, 32, 9), (947, 40, 6),
         (1108, 40, 4), (1440, 50, 5), (1520, 50, 4), (1650, 70, 2.5), (1742, 45, 4.5), (4780, 220, 3),
         (5030, 190, 3.5), (9700, 500, 2)]


def scene():
    """Every moving part sounds through the frame; with the whirr it fills the room, and the hum joins dry."""
    parts = linkage() + keystrokes() + knocks() + latch_ticks() + clutch() + carriage() + margin_stop() + basket()
    machine = amp(1.5) * (shaped(parts, lambda hz: bumps(FRAME, hz)) + whirr())
    return spread(machine + amp(-3.5) * room(machine)) + hum()


# treble notches of the ports: pitch_hz, width_hz, lift_db
PORT_NOTCHES = [(5300, 250, -12), (7530, 170, -11), (7770, 200, -9)]
LOW_CUT_HZ, TOP_HZ = 35, 15700


def record(dry):
    """The ports notch the treble, deep bass is lost, the hardest peaks are rounded and the band ends steeply."""
    size = next_fast_len(N + SR // 4)
    heard = shaped(dry, lambda hz: bumps(PORT_NOTCHES, hz))
    low_cut = signal.butter(3, LOW_CUT_HZ, "highpass", fs=SR, output="sos")
    heard = signal.sosfilt(low_cut, heard)
    heard = heard / (1 + np.abs(heard / .9) ** 6) ** (1 / 6)
    band = 1 / (1 + (np.fft.rfftfreq(size, 1 / SR) / TOP_HZ) ** 200)
    return irfft(rfft(heard, size) * band, size)[:, :N]


dry = scene()
out = record(dry)
wrap_up_sound(out)
```